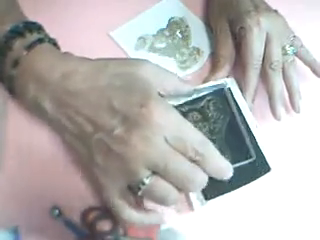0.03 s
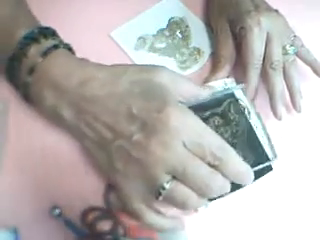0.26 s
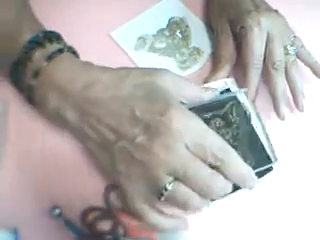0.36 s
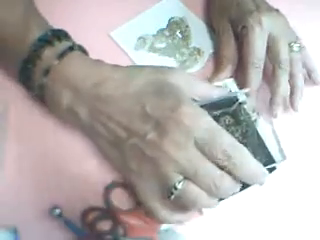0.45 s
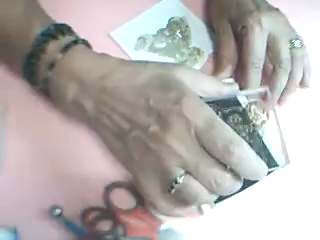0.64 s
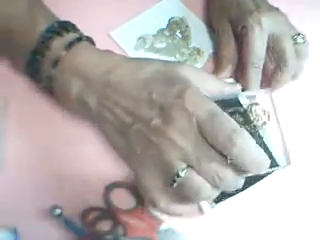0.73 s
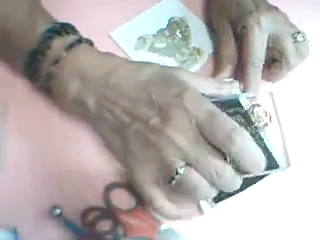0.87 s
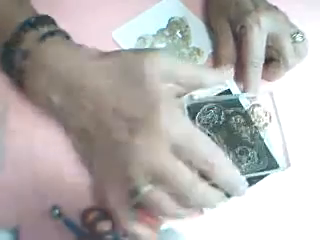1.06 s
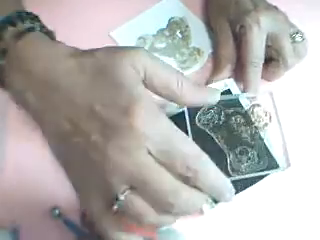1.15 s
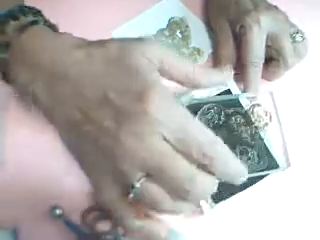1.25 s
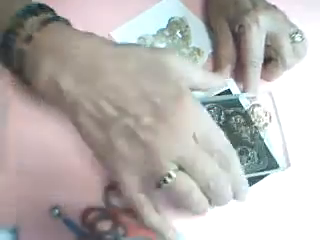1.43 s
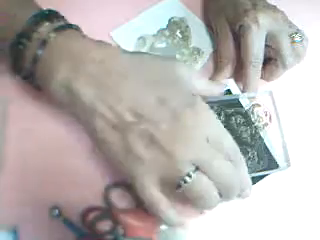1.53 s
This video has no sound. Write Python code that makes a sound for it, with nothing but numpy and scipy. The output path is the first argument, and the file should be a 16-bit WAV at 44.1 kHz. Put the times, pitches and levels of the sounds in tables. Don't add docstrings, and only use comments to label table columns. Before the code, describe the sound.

A stamp block taps a plastic ink pad case on a hollow desk in quick knocks, the loudest at half a second, then small shifts and faint squeaky rubbing; close microphone, quiet hissy room.

```python
import sys
import numpy as np
from scipy import signal
from scipy.fft import rfft, irfft
from scipy.io import wavfile
from scipy.ndimage import uniform_filter1d

SR = 44100
rng = np.random.default_rng(int(sys.argv[2]) if len(sys.argv) > 2 else 0)


def convert_level_to_amplitude(level_db):
    exponent = np.asarray(level_db, float) / 20
    return 10 ** exponent


def pcm_store(signal):
    levels = np.round(np.clip(np.atleast_2d(signal), -1, 1) * 32767)
    wavfile.write(sys.argv[1], SR, levels.astype(np.int16).T)


N = 70560


def evened(x):
    return x / np.sqrt(np.mean(x ** 2) + 1e-20)


def read(points, hz):
    point_hz, value = np.transpose(points)
    return np.interp(np.log(hz + 1), np.log(point_hz + 1), value)


def add(mix, start_s, sound):
    part = mix[round(start_s * SR):][:len(sound)]
    part += sound[:len(part)]


def coloured(x, points):
    gain = convert_level_to_amplitude(read(points, np.fft.rfftfreq(len(x), 1 / SR)))
    return evened(irfft(rfft(x) * gain, len(x)))


def resonate(x, hz, width_hz):
    turn = np.exp(2j * np.pi * np.cumsum(hz * np.ones(len(x))) / SR)
    pole = np.exp(-np.pi * width_hz / SR)
    return 2 * (turn * signal.lfilter([1 - pole], [1, -pole], x / turn + 1e-18)).real


def swell(t, level_db, rise_s, t60_s):
    rise = np.minimum(t / max(rise_s, 1e-4), 1)
    return rise * convert_level_to_amplitude(level_db - 60 * np.maximum(t - rise_s, 0) / t60_s)


def air():
    # hz, level_db
    hiss = [(25, -5), (55, -2.5), (115, 3.5), (230, -6), (990, -10.5), (1270, -15.5), (12400, -35),
            (14000, -68)]
    level_db, patch_db = -56, 1.56
    frames, hz = N // 256 + 5, np.fft.rfftfreq(1024, 1 / SR)
    real, imag, patches = rng.standard_normal((frames, 513, 3)).T
    patches = evened(uniform_filter1d(uniform_filter1d(patches, 10, 0), 12, 1))
    z = (real + 1j * imag) * convert_level_to_amplitude(read(hiss, hz)[:, None] + patch_db * patches)
    return convert_level_to_amplitude(level_db) * evened(signal.istft(z, nperseg=1024, noverlap=768)[1][:N])


def drone():
    # time_s, pitch_hz, level_db, whine_db
    course = [(0, 161.6, -52.5, -93), (.5, 162, -84, -59), (0.951, 155.7, -55, -81),
              (1.07, 161.3, -63.5, -80), (1.125, 159, -51, -80), (1.19, 163.9, -54.5, -82),
              (1.27, 165.8, -47.5, -72), (1.33, 168.6, -54.5, -67), (1.38, 168.7, -51.5, -68.5),
              (1.46, 172, -61.5, -75), (1.508, 166.4, -46, -68), (1.55, 167.6, -57.5, -62),
              (1.6, 167.2, -52, -72)]
    wander_hz, octave_db, whine_order, whine_width_hz = 2.37, -17.5, 6.2, 83.3
    time_s, *controls = np.transpose(course)
    hz, level_db, whine_db = (np.interp(np.arange(N) / SR, time_s, v) for v in controls)
    noise = rng.standard_normal((2, N))
    wander = wander_hz * evened(uniform_filter1d(noise[0], 1500))
    phase = 2 * np.pi * np.cumsum(hz + wander) / SR
    tone = np.sqrt(2) * (np.sin(phase) + convert_level_to_amplitude(octave_db) * np.sin(2 * phase))
    whine = resonate(noise[1], whine_order * hz, whine_width_hz)
    whine = resonate(whine, whine_order * hz, whine_width_hz)
    return convert_level_to_amplitude(level_db) * tone + convert_level_to_amplitude(whine_db) * evened(whine)


def slide():
    # time_s, rub_db, squeal_hz, squeal_db
    course = [(.6, -100, 8700, -100), (.68, -69, 8700, -90), (0.869, -66, 9380, -79),
              (0.899, -63.5, 9720, -79), (.96, -67, 9800, -73), (1.029, -64.5, 9500, -81),
              (1.069, -70, 8820, -80), (1.10, -68, 8500, -74.5), (1.22, -100, 8200, -100)]
    # hz, width_hz, level_db
    modes = [(4440, 110, -8.5), (2800, 7500, 5.5), (5100, 350, -3.5), (5770, 170, -8), (6080, 580, -19)]
    grip_db, squeal_width_hz = 6.5, 16
    time_s, *controls = np.transpose(course)
    rub_db, squeal_hz, squeal_db = (np.interp(np.arange(N) / SR, time_s, v) for v in controls)
    noise = rng.standard_normal((len(modes) + 1, N))
    grip = grip_db * evened(uniform_filter1d(uniform_filter1d(noise, 1200, 1), 800, 1))
    rub = np.zeros(N)
    for (hz, width_hz, level_db), catch_db, x in zip(modes, grip, noise[::-1]):
        band = evened(resonate(resonate(x, hz, width_hz), hz, width_hz))
        rub += convert_level_to_amplitude(level_db + catch_db * min(100 / width_hz, 1)) * band
    squeal = evened(resonate(noise[0], squeal_hz, squeal_width_hz))
    return convert_level_to_amplitude(rub_db) * evened(rub) + convert_level_to_amplitude(squeal_db) * squeal


def chirp(length_s, hz, level_db):
    t = np.arange(0, length_s, 1 / SR)
    jitter_rad = 0.018 * np.cumsum(rng.standard_normal(len(t)))
    return convert_level_to_amplitude(level_db) * np.sin(np.pi * t / length_s) ** .5 * np.sin(2 * np.pi * hz * t + jitter_rad)


def fizz(level_db, hold_s, t60_s):
    # hz, level_db
    pop_spectrum = [(1060, -52), (1800, -35), (2570, -9), (3900, -18), (4550, -4.5), (6390, -8),
                    (6980, -20), (8670, -2.5), (12400, -34), (16100, -51), (22000, -120)]
    # hz, width_hz, level_db
    modes = [(2777, 41, -3), (4670, 99, -3), (5290, 57, -5), (6540, 45, -6.5), (7430, 27, 1.5),
             (7900, 30, -9), (8680, 140, 4.5), (9660, 88, -2), (9600, 44, -14), (11300, 100, -7)]
    ring_db, pops_per_s, pop_db = 0.5, 6500, 0
    t = np.arange(SR // 2) / SR
    size = convert_level_to_amplitude(pop_db * rng.exponential(1, len(t)))
    pops = size * (rng.random(len(t)) < pops_per_s / SR) * rng.standard_normal(len(t))
    rung = sum(convert_level_to_amplitude(db) * evened(resonate(pops, hz, width_hz)) for hz, width_hz, db in modes)
    sound = evened(coloured(pops, pop_spectrum) + convert_level_to_amplitude(ring_db) * evened(rung))
    fall = convert_level_to_amplitude(level_db - 60 * np.maximum(t - hold_s, 0) / t60_s)
    return np.minimum(t / 0.0012, 1) * fall * sound


def snap(level_db, rise_s, t60_s, tilt_db):
    t = np.arange(SR // 4) / SR
    spectrum = [(900, -30), (1800, 0), (10500, 2.5 * tilt_db), (13000, -50)]  # hz, level_db
    return swell(t, level_db, rise_s, t60_s) * coloured(rng.standard_normal(len(t)), spectrum)


def clack(hz, level_db, rise_s, t60_s):
    t = np.arange(SR // 4) / SR
    return swell(t, level_db, rise_s, t60_s) * -np.sin(2 * np.pi * hz * t)


def ring(modes, t):
    scatter_db, detune = 4.5, 0.016
    hz, level_db, t60_s = np.transpose(modes)[:, :, None]
    luck = rng.standard_normal((2, len(modes), 1))
    fall = convert_level_to_amplitude(level_db + scatter_db * luck[0] - 60 * t / t60_s)
    return (fall * np.sin(2 * np.pi * hz * (1 + detune * luck[1]) * t)).sum(0)


def tap(thud_db, body_db, knock_db, crack_db):
    # hz, level_db, t60_s
    desk_modes = [(66.5, -6.5, 0.14), (92.2, 0.5, 0.13), (141, -21, 0.055)]
    # hz, level_db, t60_s
    body_modes = [(181, -8.5, 0.061), (210.4, -11, 0.073), (240.2, -3.5, 0.072), (276.6, -2.5, 0.067)]
    # hz, level_db, t60_s
    knock_modes = [(318.6, -1.5, 0.052), (353.2, 0, 0.06), (418, -5.5, 0.025), (460.4, -13.5, 0.052),
                   (585, -12.5, 0.045), (662, -20.5, 0.059), (696, -19.5, 0.033)]
    # hz, level_db, t60_s
    shell_modes = [(634, -2.5, 0.036), (828, -2, 0.037), (959, -2.5, 0.046), (1192, -1.5, 0.015),
                   (1423, -6, 0.027), (1515, -18, 0.07), (1920, -23, .03)]
    # hz, level_db
    crack_spectrum = [(500, 0.5), (900, 4), (1300, -7.5), (2000, -19.5), (3000, -26), (4500, -57),
                      (8000, -46)]
    push_s, crack_rise_s = 0.0025, 0.00094
    burst_db, burst_t60_s, tail_db, tail_t60_s = 3.5, 0.016, -15.5, 0.21
    t = np.arange(SR // 2) / SR
    low = convert_level_to_amplitude(thud_db) * ring(desk_modes, t)
    low -= convert_level_to_amplitude(body_db) * ring(body_modes, t)
    low -= convert_level_to_amplitude(knock_db) * ring(knock_modes, t)
    fall = convert_level_to_amplitude(-60 * t / burst_t60_s) + convert_level_to_amplitude(tail_db - 60 * t / tail_t60_s)
    burst = fall * coloured(rng.standard_normal(len(t)), crack_spectrum)
    crack = ring(shell_modes, t) + convert_level_to_amplitude(burst_db) * burst
    return (1 - np.exp(-t / push_s)) * low + np.minimum(t / crack_rise_s, 1) * convert_level_to_amplitude(crack_db) * crack


def room(x):
    # hz, t60_s
    decay = [(60, 0.79), (200, 0.19), (450, 0.17), (1000, 0.32), (4000, 0.5), (10000, 0.25)]
    echoes = np.zeros(SR)
    at = np.arange(150, SR - 20, 20)
    echoes[at + rng.integers(0, 20, len(at))] = rng.choice([-1., 1.], len(at))
    hz, t, z = signal.stft(echoes, SR, nperseg=256)
    tail = signal.istft(z * convert_level_to_amplitude(-60 * t / read(decay, hz)[:, None]), SR, nperseg=256)[1]
    return signal.fftconvolve(x, tail / np.linalg.norm(tail))[:N]


def scene():
    # start_s, length_s, hz, level_db
    chirps = [
        (.274, .006, 2500, -54),
        (.537, .016, 8010, -48),
    ]
    # start_s, level_db, hold_s, t60_s
    squeezes = [
        (0.2523, -46, 0.034, 0.13),
        (0.569, -47, 0.016, 0.21),
        (0.767, -62, 0.0068, 0.054),
    ]
    # start_s, level_db, rise_s, t60_s, tilt_db_per_octave
    snaps = [(.226, -45.5, 0.014, 0.087, -13.5), (.321, -50.5, 0.00068, 0.16, -8),
             (.399, -48, 0.0028, 0.085, -9.5), (.413, -56, 0.0015, 0.27, -5),
             (.521, -34.5, 0.0015, 0.17, -8.5), (.525, -70, 0.00086, 0.081, -8),
             (.64, -56.5, 0.0093, 0.13, -25)]
    # start_s, hz, level_db, rise_s, t60_s
    clacks = [(.002, 66.3, -40.5, 0.0039, 0.11), (.024, 89, -36, 0.0046, 0.051),
              (.2225, 709, -37, 0.0012, 0.038), (.2228, 2050, -45, .0005, 0.024),
              (.230, 1817, -50, 0.0023, .06), (.2355, 2630, -49, .002, 0.043),
              (.2435, 2160, -50, 0.00039, .025), (.253, 2470, -49, .002, 0.062),
              (.312, 980, -45, 0.0026, .04), (.3212, 575, -27, 0.0012, 0.03),
              (.3295, 215, -23, 0.0013, 0.096), (.3555, 293, -31.5, 0.0014, 0.03),
              (.3888, 903, -30, 0.00066, 0.024), (.3892, 1190, -31.5, 0.00099, 0.016),
              (.409, 478, -30, 0.0031, 0.045), (.410, 1694, -48.5, 0.0015, 0.051),
              (.5215, 700, -27.5, 0.0018, 0.034), (.5225, 815.3, -32, 0.0012, 0.21),
              (.523, 1335, -34.5, 0.00082, 0.08), (.523, 2800, -32.5, 0.00058, 0.029),
              (.5245, 1676, -37, 0.0026, 0.089), (.525, 11300, -59, 0.007, 0.27),
              (.530, 8010, -40, .006, 0.11), (.5335, 401, -8, 0.0022, 0.038),
              (.546, 559, -25.5, 0.001, 0.078), (.55, 353, -29, 0.0025, 0.23),
              (.536, 497, -24, 0.0019, 0.14), (.565, 1414, -47, .003, .05), (.243, 471, -30, 0.0019, 0.036),
              (.856, 288, -37, 0.0022, 0.055), (.626, 950, -40.5, 0.0052, 0.039),
              (.635, 240, -28, 0.0011, 0.24), (.8138, 960, -41.5, .0005, 0.036),
              (.8142, 1630, -48.5, 0.00041, 0.013), (.814, 1207, -50.5, .0005, 0.058),
              (.5365, 2410, -41, .001, 0.051), (.527, 2350, -61, 0.0011, .04),
              (.523, 4940, -47, 0.00061, 0.032)]
    # start_s, hz, level_db, rise_s, t60_s
    whistles = [(.655, 5750, -79, .02, .3), (.70, 5900, -75, .02, .3), (.83, 5890, -74, .015, .2),
                (.885, 5910, -75, .02, .2), (.908, 4500, -74, .02, .25), (1.015, 5910, -76, .01, .2),
                (1.07, 5920, -77, .015, .25), (.265, 2930, -67, .02, .5)]
    # start_s, thud_db, body_db, knock_db, crack_db
    nudges = [(.002, -40, -38, -65, -61), (.026, -37, -39.5, -57, -84), (0.714, -29.5, -31, -61, -57),
              (.722, -65, -35, -36.5, -60), (0.759, -39, -69, -62, -59), (0.731, -44, -34.5, -50, -76),
              (0.8141, -35, -57, -60, -46.5), (0.8548, -25.5, -33, -35.5, -66),
              (0.881, -37.5, -45.5, -56, -70), (.904, -48, -45.5, -53, -64), (1.023, -46, -46, -60, -58.5)]
    # start_s, thud_db, body_db, knock_db, crack_db
    taps = [(.216, -43, -37.5, -31, -76), (.2232, -16, -23.5, -27.5, -35), (.233, -47, -24.5, -27.5, -46),
            (.242, -50, -22, -21.5, -46), (.254, -27, -47, -37, -73), (.3155, -56, -32.5, -32, -74),
            (.3215, -27.5, -16.5, -22, -52), (.3305, -44, -15.5, -43, -46), (.340, -50, -37, -25.5, -57),
            (.354, -59, -51, -61, -66), (.3888, -15, -36, -27, -36.5), (.3925, -34, -27, -30, -60),
            (.407, -27.5, -21, -24, -36), (.421, -40, -24.5, -58, -51), (.5205, -21, -11, -12, -22.5),
            (.5245, -12, -8.5, -6.5, -26), (.533, -11, -42, -16, -31.5), (.541, -43, -41, -12, -30),
            (.549, -46, -17.5, -24, -58), (.5715, -21, -23, -26, -48), (.6345, -27.5, -22.5, -32, -55),
            (.6433, -31, -21.5, -35, -80), (.656, -46, -25, -26, -58)]
    low_cut_hz, room_db = 43.4, -12.5

    desk = slide()
    events = ((chirps, chirp), (squeezes, fizz), (snaps, snap), (clacks, clack), (whistles, clack),
              (nudges, tap), (taps, tap))
    for table, source in events:
        for start_s, *row in table:
            add(desk, start_s, source(*row))
    low_cut = signal.butter(2, low_cut_hz, "high", fs=SR)
    desk = signal.lfilter(*low_cut, signal.lfilter(*low_cut, desk))
    return (desk + convert_level_to_amplitude(room_db) * room(desk) + air() + drone())[None]


def roll_off(x):
    return signal.sosfilt(signal.butter(12, 12520, fs=SR, output="sos"), x)


def record(dry):
    gain, ceiling, offset = 1.078, .76, 0.0053
    loud = gain * dry
    flat = loud / (1 + (loud / ceiling) ** 6) ** (1 / 6)
    return roll_off(flat + offset)


dry = scene()
out = record(dry)
pcm_store(out)
```